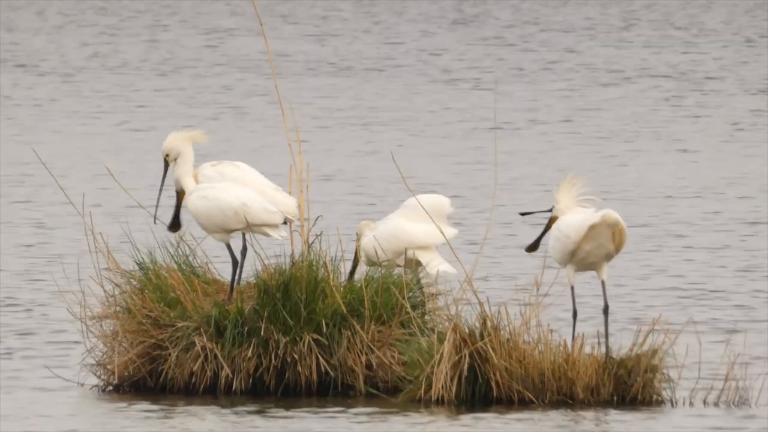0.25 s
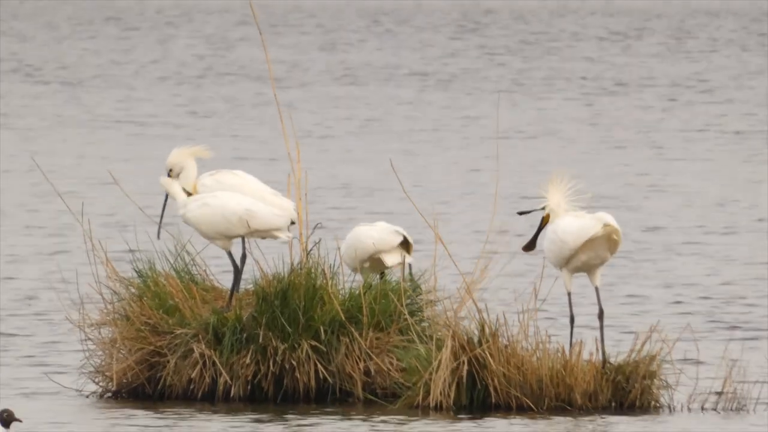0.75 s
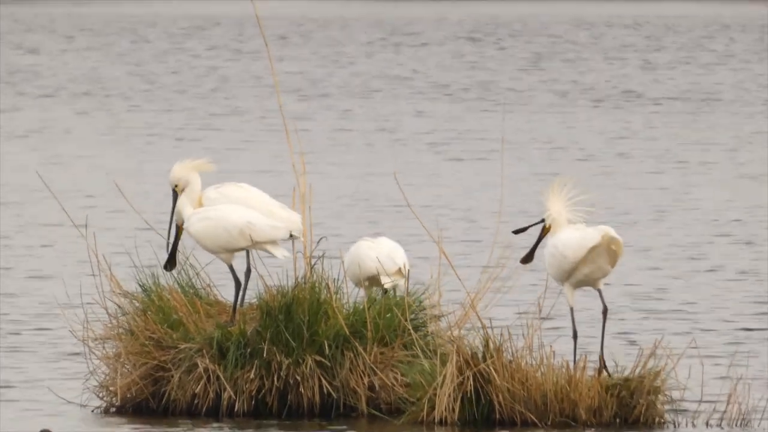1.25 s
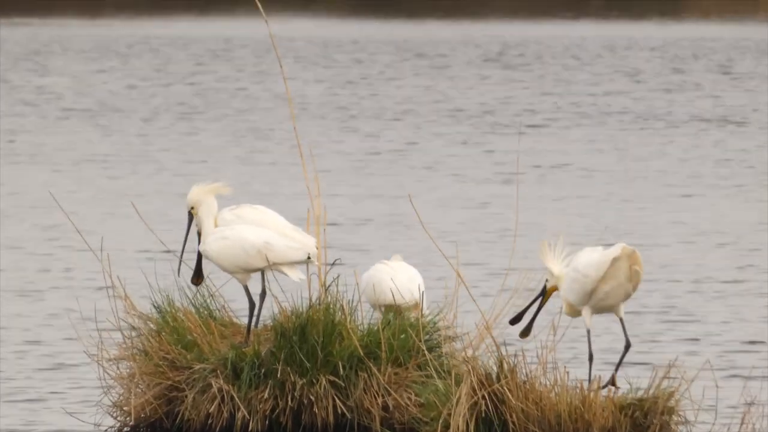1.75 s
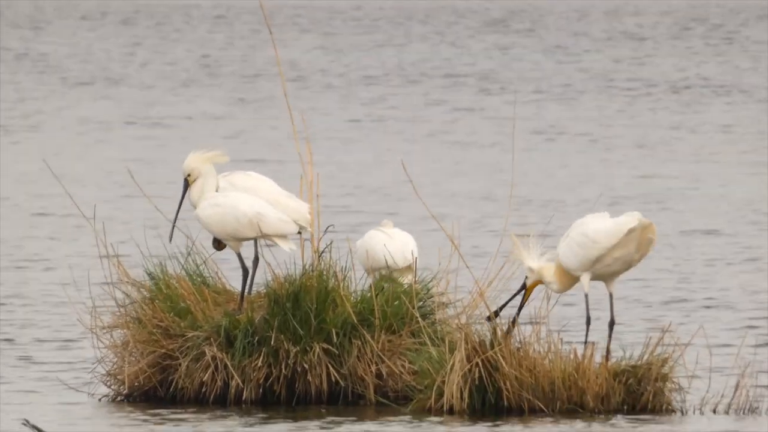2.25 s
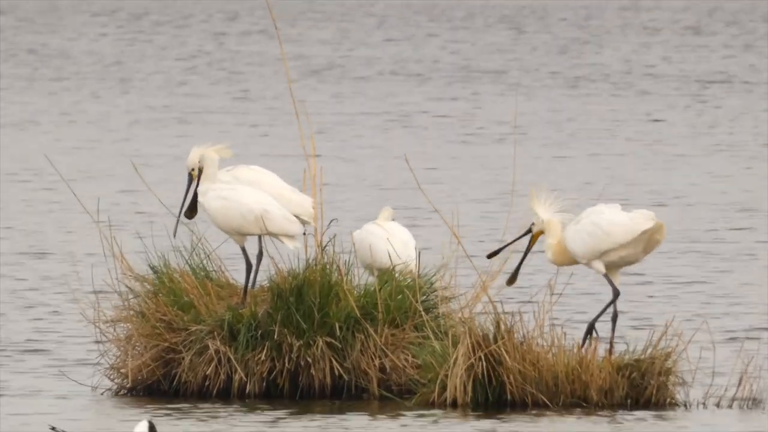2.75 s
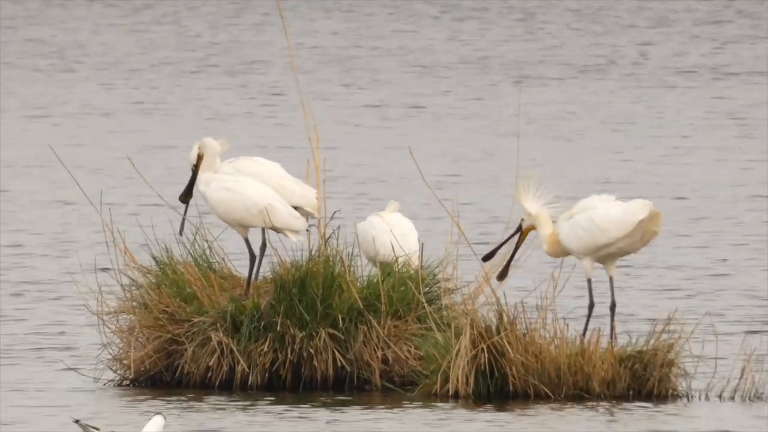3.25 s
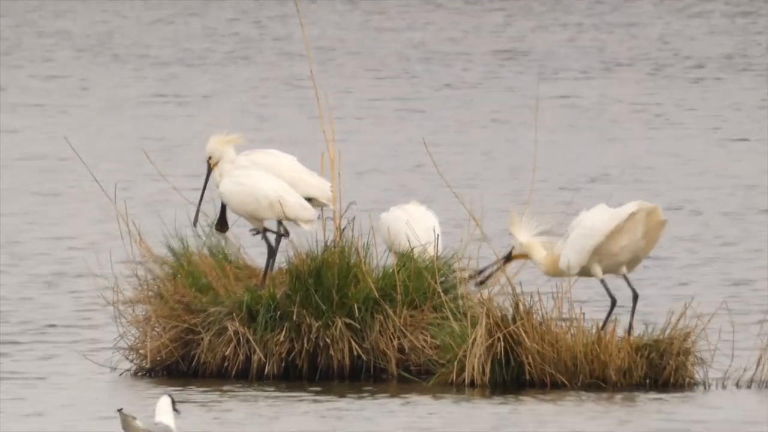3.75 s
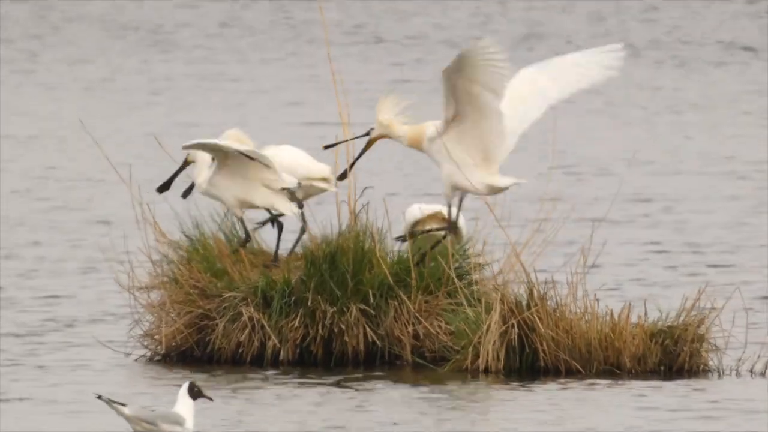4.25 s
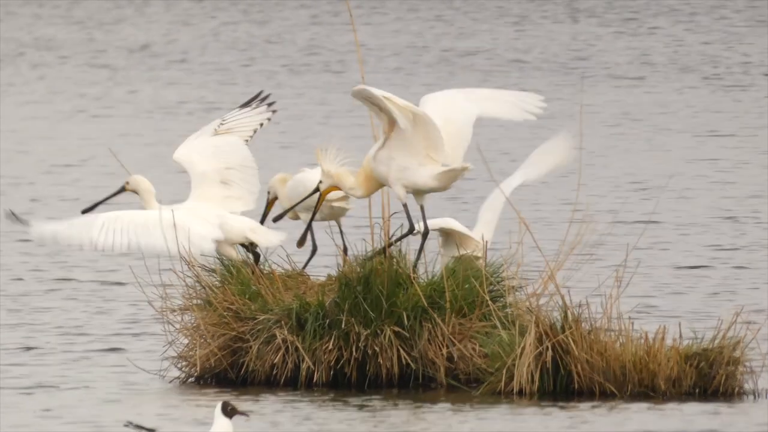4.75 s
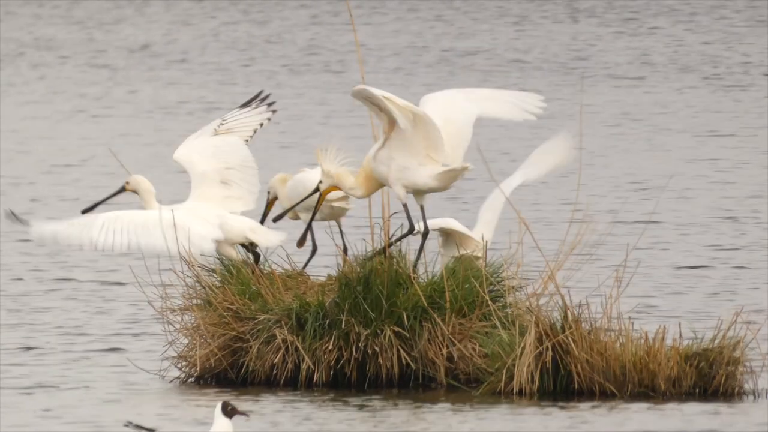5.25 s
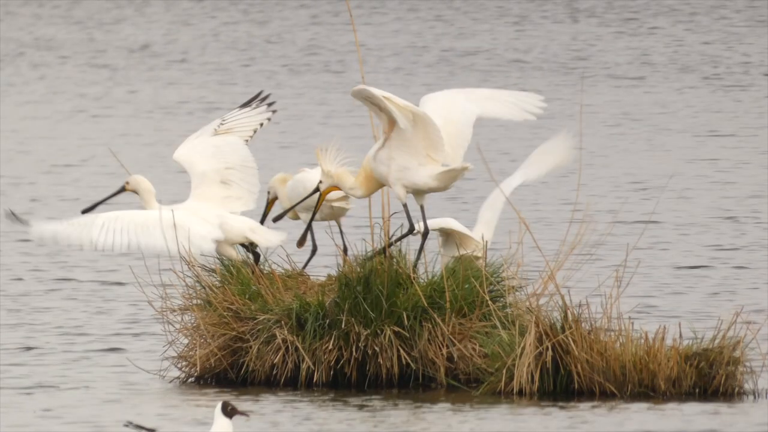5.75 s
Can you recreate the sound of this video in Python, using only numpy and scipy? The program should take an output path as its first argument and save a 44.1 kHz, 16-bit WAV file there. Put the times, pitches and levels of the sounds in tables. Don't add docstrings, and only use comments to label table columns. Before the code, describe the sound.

Dozens of gulls yelp and wail in a dense distant chorus, one nearer bird trilling repeatedly, with low wind buffeting and faint toad hoots.

```python
import sys
import numpy as np
from scipy import signal
from scipy.fft import rfft, irfft, next_fast_len
from scipy.io import wavfile
from scipy.ndimage import uniform_filter1d

SR = 44100
rng = np.random.default_rng(int(sys.argv[2]) if len(sys.argv) > 2 else 0)


def voltage_ratio(decibels):
    exponent = np.asarray(decibels, float) / 20
    return 10 ** exponent


def persist_wave(psi):
    counts = np.round(np.clip(psi, -1, 1) * 32767).astype(np.int16)
    wavfile.write(sys.argv[1], SR, np.atleast_2d(counts).T)


N = 265482
T = np.arange(N) / SR

# (t/s, effort/dB, beak opening/dB, shrillness/dB)
COLONY = [(0, -42, 1, 0), (.3, -41, 2, 0), (.57, -44, -2, -1), (.77, -39.5, 0, 0), (1.1, -39, 0, 0),
          (1.4, -40, 0, -3), (1.7, -39, -1, 1), (2.35, -41, 0, 1), (2.85, -45, 5, -3), (3.15, -39, -1, 0),
          (3.47, -47, -3, -2), (3.74, -41, 1, 0), (4.3, -48, 8, 0), (4.48, -46, 0, 1), (4.85, -49, 6, 2),
          (5.2, -49.5, 6.5, -2), (5.68, -45, 5, -5), (6.02, -44, 7, -6)]
YELP = .04


def curves(table):
    s, *columns = np.transpose(table)
    return [np.interp(T, s, c) for c in columns]


def shape_db(hz, table):
    f, db = np.transpose(table)
    return np.interp(np.log(np.maximum(hz, 1)), np.log(f), db)


def unit(x):
    return x / np.sqrt(np.mean(x ** 2))


def walk(rate, size):
    knots = int(size * rate / SR) + 2
    return np.interp(np.arange(size) * rate / SR, np.arange(knots), 1.2 * rng.standard_normal(knots))


def tint(x, gain):
    size = 2 * next_fast_len(len(x) // 2 + 1)
    hz = np.arange(size // 2 + 1) * SR / size
    return irfft(rfft(x, size) * gain(hz), size)[:len(x)]


def bump(hz, centre_hz, octaves):
    return np.exp(-.5 * (np.log2(np.maximum(hz, 1) / centre_hz) / octaves) ** 2)


def add(out, s, x):
    i = int(s * SR)
    x, i = x[max(-i, 0):], max(i, 0)
    out[i:i + len(x)] += x[:N - i]


def swell(s, db, rise, fall):
    return voltage_ratio(db - 20 * np.maximum((s - T) / rise, (T - s) / fall))


def duck_db():
    # (deepest point/s, depth/dB, recovery/s)
    ducks = [
        (.85, -8, .11),
        (1.5, -3, .06),
        (2.91, -3, .08),
        (3.55, -4, .07),
        (4.24, -2, .06),
        (4.53, -8, .04),
        (4.59, -13, .2),
        (4.77, -9, .06),
        (5.1, -2, .06),
        (5.52, -5, .06),
    ]
    attack_s = .035
    return sum(db * np.interp(T, [s - attack_s, s, s + back], [0, 1, 0]) for s, db, back in ducks)


def throat(hz):
    # (f/Hz, level/dB)
    formants = [(600, -52), (900, -20.5), (1250, -12), (1550, 2), (1900, 3.5), (2300, -4), (2750, -10),
                (3500, -5.5), (4300, -7.5), (4900, -13), (5600, -22.5), (6800, -30), (9000, -47),
                (14000, -57.5)]
    return voltage_ratio(shape_db(hz, formants))


def cry(hz, gain, throb_hz, depth, rough, half=0., edge=0.095, count=12, start=None, yelp=0.):
    size = len(hz)
    loose = start is None
    first = rng.random() if loose else start
    throb = throb_hz * (1 + 0.058 * loose * walk(26.25, size))
    beat = 2 * np.pi * (first + np.cumsum(throb) / SR)
    shaky_hz = hz * (1 + rough * walk(900, size) + yelp * np.sin(beat))
    phase = 2 * np.pi * np.cumsum(shaky_hz) / SR
    steps = np.arange(3, 2 * count + 1) / 2 if half else np.arange(1, count + 1)
    x = 0
    for k in steps:
        level = np.repeat(gain(k, k * hz[::64]), 64)[:size]
        x = x + level * (half if k % 1 else 1) * np.sin(k * phase)
    gate = 1 - depth * (.5 - .5 * np.tanh(4.1 * np.cos(beat) + 0.46))
    return x * unit(gate * voltage_ratio(1.63 * walk(39.6, size))) * signal.windows.tukey(size, 2 * edge)


def chorus(count=115):
    out = np.zeros(N)
    for i, (late, high, long, fast, falling) in enumerate(rng.random((count, 5))):
        t = np.linspace(0, 1, int((.2 + .35 * long) * SR))
        pitch = (740 + 310 * high) * (1 + .07 * np.sin(np.pi * t ** .7) - .12 * falling * t)
        call = cry(pitch, lambda k, f: throat(f), throb_hz=45 + 55 * fast, depth=.9, rough=.025,
                   count=8, yelp=YELP * falling)
        add(out, (i + late) / count * 6.3 - .3, voltage_ratio(-10 * long) * call)
    tail = np.arange(int(.25 * SR)) / SR
    echo = rng.standard_normal(len(tail)) * np.exp(-tail / 0.071)
    out = out + voltage_ratio(-41) * signal.fftconvolve(out, echo)[:N]
    out = out * signal.windows.tukey(N, .002)
    low = lambda f: 1 / (1 + (f / 2400) ** 16)
    under = lambda f: 1 / (1 + (f / 3900) ** 16)
    top = lambda f: 1 - 1 / (1 + (f / 5200) ** 16)
    parts = [tint(out, g) for g in (low, lambda f: under(f) - low(f), top)]
    parts.append(out - sum(parts))
    body, middle, shrill, upper = [x / np.sqrt(uniform_filter1d(x ** 2, size=6000) + 1e-9) for x in parts]
    effort_db, open_db, shrill_db = curves(COLONY)
    mix = body + voltage_ratio(-8 + open_db) * middle
    mix = mix + voltage_ratio(-21.5 + .65 * open_db) * shrill
    mix = mix + voltage_ratio(-11 + open_db + shrill_db) * upper
    return voltage_ratio(effort_db - 3 + duck_db()) * mix


def throaty_calls():
    # (t/s, length/s, first pitch f/Hz, last pitch f/Hz, level/dB)
    rasps = [(-.05, .25, 775, 720, -50), (.148, .3, 829, 809, -50), (.351, .14, 979, 832, -52),
             (.597, .21, 880, 856, -56), (.881, .28, 850, 909, -49.5), (1.1, .19, 761, 711, -48),
             (1.303, .18, 880, 850, -47), (1.501, .096, 660, 654, -59), (1.7, .25, 960, 940, -47),
             (1.974, .15, 995, 1065, -46.5), (1.998, .25, 817, 769, -49.5), (2.968, .25, 1143, 1100, -52),
             (3.617, .19, 827, 784, -52.5), (4.48, .12, 990, 930, -56), (4.625, .17, 990, 960, -56),
             (4.85, .24, 960, 910, -55), (3.85, .25, 1000, 1040, -52), (5.72, .28, 920, 872, -48.5),
             (-.04, .14, 1125, 1110, -51), (1.02, .24, 1180, 1090, -54), (4.14, .36, 880, 985, -51),
             (5.84, .17, 1010, 880, -49), (5.74, .18, 740, 720, -54), (1.55, .33, 790, 765, -51),
             (2.76, .2, 985, 960, -51), (.42, .13, 900, 820, -51), (4.44, .13, 800, 770, -54)]
    # (t/s, length/s, first f/Hz, last f/Hz, level/dB)
    wails = [(-.04, .16, 1015, 975, -48), (.27, .27, 1010, 820, -49), (.6, .23, 855, 900, -50),
             (1.2, .28, 1135, 950, -51), (1.53, .4, 1135, 1120, -51), (1.5, .24, 985, 965, -48),
             (2.04, .17, 795, 775, -49), (2.19, .39, 990, 800, -44.5), (2.56, .25, 810, 770, -48),
             (2.64, .14, 1000, 990, -52), (3.02, .25, 930, 840, -45), (3.26, .34, 960, 810, -48),
             (3.62, .25, 1150, 1160, -55)]
    # (t/s, length/s, first f/Hz, last f/Hz, level/dB)
    thin_wails = [
        (-.05, .28, 930, 888, -49.5),
        (.93, .16, 905, 895, -55),
        (1.9, .25, 1060, 1030, -55),
        (3.1, .16, 865, 870, -56),
        (3.36, .23, 930, 835, -57.5),
        (1.17, .16, 885, 840, -54),
        (2.1, .22, 1045, 1025, -55),
        (2.5, .22, 890, 925, -55),
        (3.6, .17, 975, 985, -59),
        (4.74, .22, 1190, 1165, -61),
    ]
    # (t/s, length/s, first pitch f/Hz, level/dB, throat f/Hz)
    rattles = [(.332, .32, 910, -65, 6420), (.9, .4, 914, -55, 4300), (1.615, .27, 940, -54.5, 4360),
               (2.026, .13, 950, -61.5, 5450), (2.4, .4, 985, -64, 5800), (3.3, .24, 990, -60, 4750),
               (3.606, .15, 890, -56, 3600), (4.085, .068, 567, -50, 2980), (4.165, .045, 533, -49, 2870),
               (4.54, .28, 965, -55.5, 4750), (4.62, .16, 1030, -62, 5000), (4.63, .14, 1090, -61, 4500),
               (4.53, .2, 985, -76, 6900), (4.58, .18, 940, -83, 9300), (2.92, .3, 1000, -75, 8300),
               (.33, .15, 1000, -75, 8500), (4.93, .27, 640, -56, 2550), (5.306, .17, 664, -53.5, 2450),
               (5.549, .1, 614, -53, 3700), (5.68, .4, 900, -50.5, 3450)]
    sag, rattle_octaves = .05, .19
    calls = [(*c, c[2] + c[3], .02, .15) for c in rasps]
    calls += [(s, n, hz, hz * (1 - sag), db, f, .029, rattle_octaves) for s, n, hz, db, f in rattles]
    calls += [(*c, c[2] + c[3], .015, .15) for c in wails]
    calls += [(*c, 2 * (c[2] + c[3]), .012, .15) for c in thin_wails]
    out = np.zeros(N)
    for s, length, hz, end_hz, db, throat_hz, shake, octaves in calls:
        pitch = hz + (end_hz - hz) * np.linspace(0, 1, int(length * SR)) ** 1.3
        colour = lambda f: bump(f, throat_hz, octaves) + 0.16 * throat(f) * throat(throat_hz) ** .5
        depth = min(.55 + throat_hz / 10000, .95)
        source = cry(pitch, lambda k, f: 1 + 0 * f, throb_hz=87, depth=depth, rough=shake, edge=.25,
                     count=10, yelp=.7 * shake)
        add(out, s, voltage_ratio(db) * unit(tint(source, colour)))
    return out


def air():
    # (f/Hz, level/dB per Hz)
    haze = [(15, -84), (25, -41), (145, -34.5), (290, -41.5), (399, -16.5), (679, -28), (1220, -17),
            (1430, -2.5), (1870, -3.5), (2570, -14), (4740, -15), (6800, -35.5), (7860, -35.5), (9220, -32),
            (14500, -51)]
    hiss = unit(tint(rng.standard_normal(N), lambda f: voltage_ratio(shape_db(f, haze))))
    effort_db = curves(COLONY)[0]
    level_db = -52 + .5 * (effort_db - effort_db.mean()) + .6 * duck_db()
    return voltage_ratio(level_db + 1.2 * walk(12, N)) * hiss


def toads():
    # (peak t/s, peak level/dB, rise by 20 dB/s, fall by 20 dB/s)
    bouts = [(.1, -63, .5, .4), (.36, -64, .4, .5), (.7, -64, .09, .1), (.8, -63, .05, .3),
             (1.45, -68, .5, .8), (1.8, -62, .9, .8), (2.3, -70, 1.2, .6), (2.65, -68, .1, .6),
             (2.88, -58.5, .4, .07), (3.4, -61.5, .5, .22), (3.6, -63, .08, .55), (4.25, -62, 2.2, 1.5),
             (4.56, -62, 1.5, .05), (4.74, -65, .12, .08), (5.49, -66, .5, .05), (5.66, -67.5, .1, 1.5),
             (5.93, -62.5, .6, .4)]
    hoots = tint(rng.standard_normal(N), lambda f: bump(f, 400, 0.12)) * voltage_ratio(1.5 * walk(20, N))
    return voltage_ratio(-3.3) * np.max([swell(*bout) for bout in bouts], axis=0) * unit(hoots)


def wind():
    # (t/s, level/dB)
    breeze = [
        (0, -72),
        (.6, -70),
        (1.4, -63),
        (2.05, -69),
        (2.65, -65),
        (3.15, -73),
        (3.7, -80),
        (4.1, -73),
        (4.95, -88),
        (6.02, -95),
    ]
    # (peak t/s, peak level/dB, rise by 20 dB/s, fall by 20 dB/s, centre f/Hz)
    gusts = [(.42, -69, .2, .4, 120), (.74, -54, .07, .2, 128), (.82, -35.5, .07, .11, 140),
             (.95, -48.5, .1, .16, 139), (1.13, -47, .12, .2, 120), (1.24, -37, .03, .065, 141),
             (2.21, -57, .2, .25, 108), (2.43, -46.5, .13, .045, 130), (2.8, -54, .2, .2, 150),
             (2.87, -42.5, .03, .1, 157), (3.37, -67, .07, .07, 137), (3.62, -68, .3, .08, 177),
             (3.75, -52.5, .03, .1, 158), (3.94, -73, .2, .25, 228), (4.49, -52, .07, .3, 128),
             (4.56, -50, .09, .07, 230), (4.69, -57, .06, .24, 193), (4.93, -72, .2, .04, 154),
             (5.2, -58, .12, .1, 150), (5.36, -62, .07, .3, 188), (2.1, -62, .06, .06, 70),
             (2.32, -59, .1, .1, 70), (2.66, -60, .1, .08, 72)]
    # (t/s, peak level/dB, f/Hz)
    thumps = [(0.394, -64, 110), (0.703, -64, 61.9), (0.709, -36.5, 116), (0.813, -37, 181),
              (1.096, -38, 93), (1.213, -29.5, 146), (1.895, -58, 102), (2.001, -57, 107),
              (2.154, -50, 96.4), (2.371, -47, 83.4), (2.73, -49, 100), (2.79, -42, 132), (2.805, -44, 135),
              (2.857, -39, 169), (3.511, -62, 110), (3.744, -57, 142), (4.486, -53, 109), (4.651, -56, 153),
              (4.91, -55, 159), (5.126, -73, 186), (5.328, -56, 258), (5.534, -60, 162), (3.93, -62, 270),
              (3.97, -63, 260), (5.55, -63, 280), (5.83, -68, 260)]
    blows = [(voltage_ratio(curves(breeze)[0]), 145)] + [(swell(*g[:4]), g[4]) for g in gusts]  # (gain, Hz)
    gain = np.max([g for g, _ in blows], axis=0)
    hz = sum(g * f for g, f in blows) / sum(g for g, _ in blows)
    rumble = 0
    for centre_hz in (66.4, 97, 135, 190, 288):
        band = unit(tint(rng.standard_normal(N), lambda f: bump(f, centre_hz, 0.25)))
        rumble = rumble + band * bump(hz, centre_hz, 0.56) * voltage_ratio(2.07 * walk(25, N))
    out = voltage_ratio(-7.5) * gain * rumble
    for s, peak_db, thump_hz in thumps:
        cycles = np.arange(int(2.5 * SR / thump_hz)) / SR * thump_hz
        add(out, s, voltage_ratio(peak_db - 2.0) * np.sin(2 * np.pi * cycles) * np.hanning(len(cycles)))
    return out


def trills():
    # (middle throb t/s, length/s, top pitch f/Hz, level/dB, head turn/0-1)
    phrases = [
        (.565, .33, 858, 2.5, 1),
        (2.7085, .36, 985, -10, .45),
        (3.3166, .35, 990, -1, 0),
        (3.8499, .26, 1013, 0, .15),
        (4.3645, .27, 977, -1, .5),
        (4.8625, .18, 940, 1, 1),
        (5.3538, .18, 930, 1.5, 1),
        (5.8731, .21, 944, 4.5, .9),
    ]
    head_db = [
        (-70, -47, -49.5, -68, -55.5, -66, -84, -90),
        (-75, -53, -51, -49, -59, -56.5, -75, -88),
        (-85, -60, -65, -50, -61, -67, -74, -81),
    ]
    throb_hz = 44
    arch, flat_hz = .092, 820
    out = np.zeros(N)
    for s, length, hz, db, turn in phrases:
        t = np.arange(-length / 2, length / 2, 1 / SR)
        levels_db = [db + np.interp(turn, (0, .5, 1), k_db) for k_db in np.transpose(head_db)]
        gain = lambda k, f: np.sqrt(2) * voltage_ratio(np.interp(k, np.arange(1, 9), levels_db) + 0 * f)
        drop = arch * min((hz - flat_hz) / (950 - flat_hz), 1)
        pitch = hz * (1 - drop * (2 * t / length) ** 2)
        half = .5 * np.interp(turn, (.3, .5, 1), (.1, 1, .6))
        edge = .27 + .2 * max(2 * turn - 1, 0)
        add(out, s - length / 2, cry(pitch, gain, throb_hz=throb_hz, depth=.88, rough=.009, half=half,
                                     edge=edge, count=8, start=-throb_hz * length / 2))
    return out


def clear_notes():
    # (t/s, length/s, first f/Hz, last f/Hz, level/dB)
    peeps = [(0.69, .035, 3850, 3950, -51), (.69, .045, 3380, 3230, -52), (1.16, 0.046, 2050, 2090, -45),
             (1.43, .05, 1870, 1880, -46), (2.685, .03, 3520, 3500, -54), (4.656, .06, 3060, 3090, -59),
             (5.21, .13, 1440, 1443, -55), (5.269, 0.049, 2950, 2870, -52), (5.49, .05, 4120, 4050, -55),
             (5.638, .04, 3980, 3960, -53), (3.44, .13, 4780, 4540, -62), (3.5, .08, 660, 620, -73),
             (3.41, .05, 880, 870, -68), (1.93, .16, 1040, 1010, -62), (4.548, .03, 4850, 4800, -57),
             (1.53, .06, 3450, 3440, -54), (4.8, .04, 5900, 6000, -66), (.6, .05, 990, 980, -62)]
    out = np.zeros(N)
    for s, length, hz, end_hz, db in peeps:
        pitch = np.linspace(hz, end_hz, int(length * SR))
        note = cry(pitch, lambda k, f: k ** -6.0 + 0 * f, throb_hz=70, depth=.4, rough=0.025, edge=0.35, count=2)
        add(out, s, voltage_ratio(db) * unit(note))
    return out


def squawks():
    # (t/s, length/s, first f/Hz, last f/Hz, level/dB)
    yelps = [
        (1.795, .09, 2830, 3030, -47.5),
        (1.785, .04, 3250, 3520, -52),
        (1.865, .05, 2750, 2600, -54),
        (2.722, .06, 2800, 2950, -47),
        (2.76, .065, 2350, 2200, -51),
        (2.78, .12, 2900, 2850, -53),
        (3.03, .06, 3000, 3000, -53),
        (5.03, .045, 2450, 2550, -54),
        (5.755, .06, 2900, 2900, -52),
        (5.91, .06, 2800, 2750, -52),
    ]
    out = np.zeros(N)
    for s, length, hz, end_hz, db in yelps:
        pitch = np.linspace(hz, end_hz, int(length * SR))
        squawk = cry(pitch, lambda k, f: k ** -6.0 + 0 * f, throb_hz=87, depth=.8, rough=.02, edge=.25,
                     count=2, yelp=YELP)
        add(out, s, voltage_ratio(db) * unit(squawk))
    return out


def ticks():
    # (t/s, peak level/dB, centre f/Hz, width/octaves)
    clicks = [
        (4.558, -51, 310, .55),
        (4.864, -62, 8500, .6),
        (3.53, -60, 640, .25),
        (3.63, -61, 850, .3),
        (3.76, -59, 700, .6),
        (4.565, -61, 800, .4),
    ]
    out = np.zeros(N)
    for s, db, hz, octaves in clicks:
        burst = tint(rng.standard_normal(1024) * np.hanning(1024) ** 4, lambda f: bump(f, hz, octaves))
        add(out, s - 512 / SR, voltage_ratio(db) * burst / np.abs(burst).max())
    return out


def scene():
    mid = chorus() + throaty_calls() + air() + toads() + wind() + trills() + clear_notes() + squawks() + ticks()
    lag = int(.004 * SR)
    return mid + voltage_ratio(-27) * np.roll(mid, lag) * np.array([[1], [-1]])


def thin_treble(x, from_hz=6850, reach=1.25):
    # (f/Hz, share of side cells kept)
    side_kept = [(900, .7), (1500, .08), (4500, .12), (7500, .6), (8500, 1)]
    # (f/Hz, share of the time left empty)
    dead_bands = [(6450, .12), (7080, .5), (7700, .45), (8500, .25)]
    grid = dict(window="cosine", nperseg=2048, noverlap=1024)
    f, _, cells = signal.stft(np.pad(x, ((0, 0), (0, 4096)), mode="reflect"), SR, **grid)
    size = np.abs(cells).mean(axis=0)
    frames = size.shape[1]
    around = uniform_filter1d(uniform_filter1d(size, size=41, axis=0), size=5, axis=1)
    kept = (size > reach * around) | (f[:, None] < from_hz)
    for hz, share in dead_bands:
        awake = np.repeat(rng.random(frames), 3)[:frames] > share
        kept &= (np.abs(f[:, None] - hz) > 75) | awake
    band = (7 * np.log2(1 + f / 300)).astype(int)
    wide = rng.random((band.max() + 1, frames))[band] < shape_db(f, side_kept)[:, None]
    mid, side = (cells[0] + cells[1]) / 2, (cells[0] - cells[1]) / 2 * wide
    return signal.istft(np.array([mid + side, mid - side]) * kept, SR, **grid)[1][:, :N]


def band_limit(x):
    return signal.sosfilt(signal.butter(12, 14760, fs=SR, output="sos"), x)


def record(dry):
    # (f/Hz, level/dB per Hz)
    self_noise = [(15, -36), (40, -9), (157, -6.5), (290, -9), (411, -1), (681, -4), (1440, -7),
                  (1780, -27), (2030, -16), (5750, -21), (7910, -22.5), (9290, -9), (14600, -23.5)]
    colour = lambda f: voltage_ratio(shape_db(f, self_noise))
    hiss = [voltage_ratio(-75.5) * unit(tint(port, colour)) for port in rng.standard_normal((2, N))]
    low_cut = signal.butter(2, 55, "high", fs=SR, output="sos")
    ports = signal.sosfilt(low_cut, dry + hiss)
    return band_limit(thin_treble(ports))


dry = scene()
out = record(dry)
persist_wave(out)
```